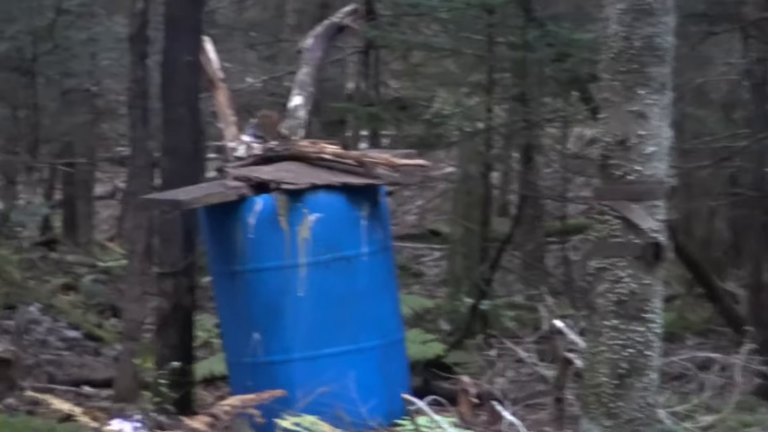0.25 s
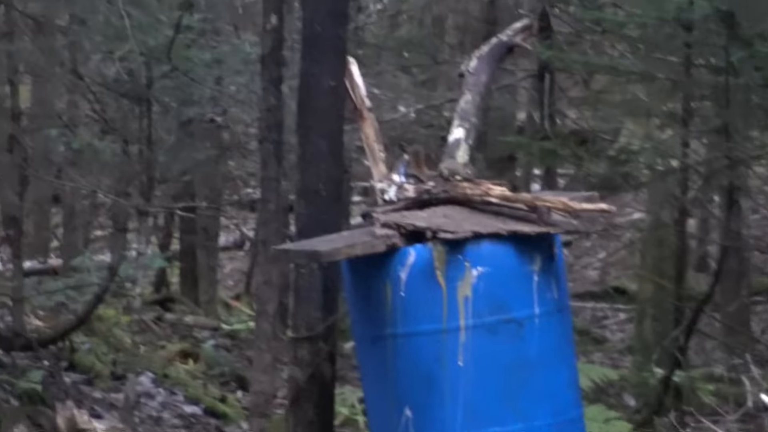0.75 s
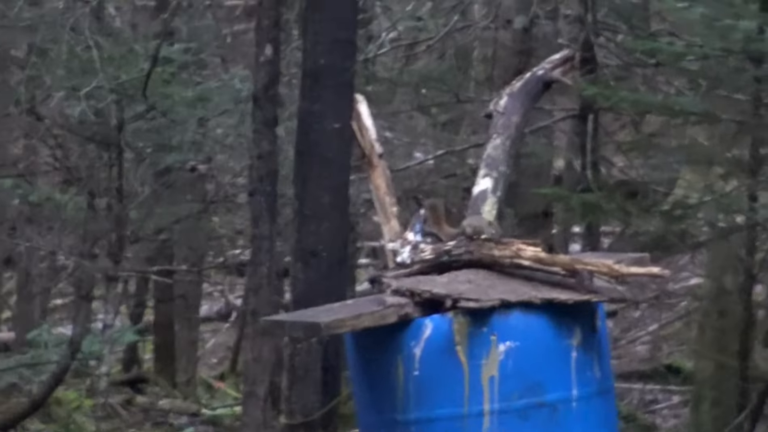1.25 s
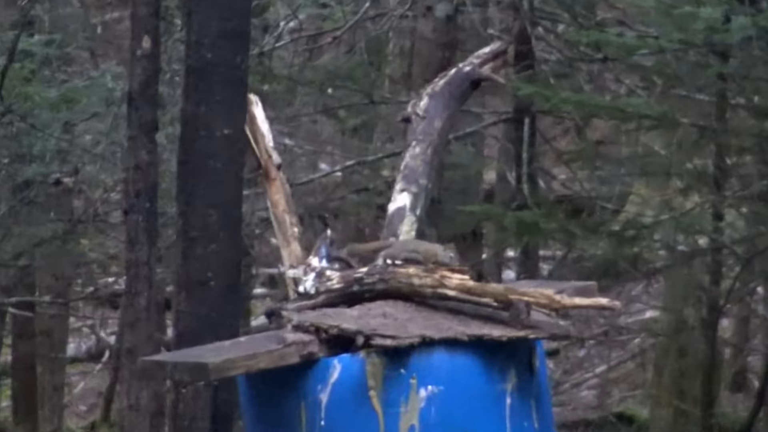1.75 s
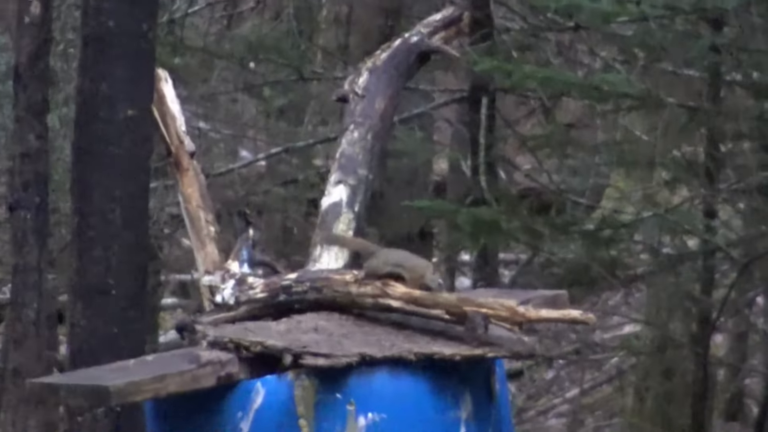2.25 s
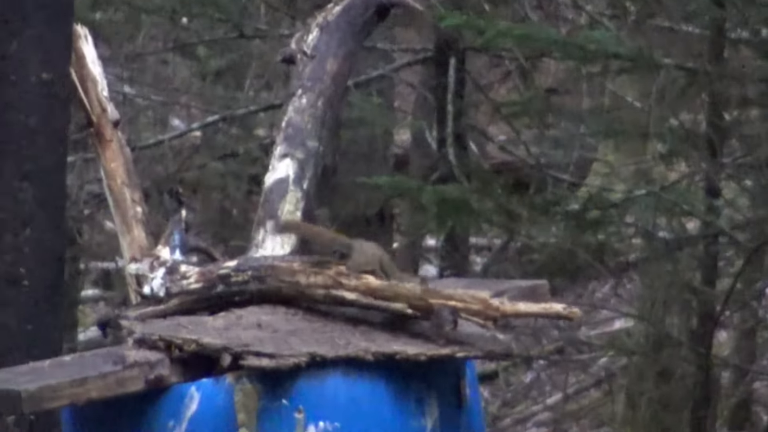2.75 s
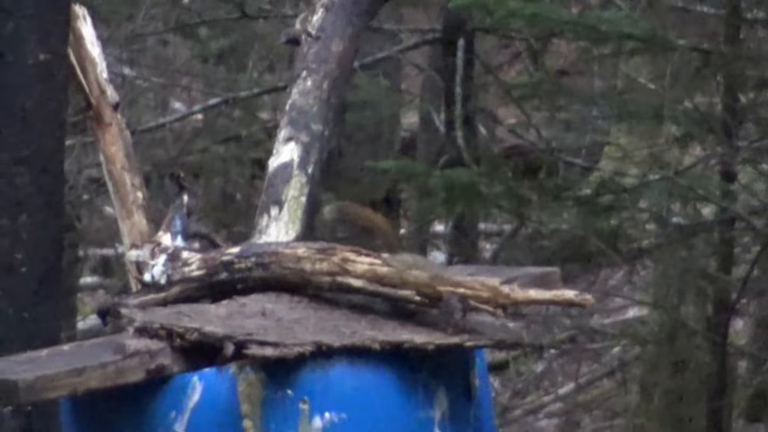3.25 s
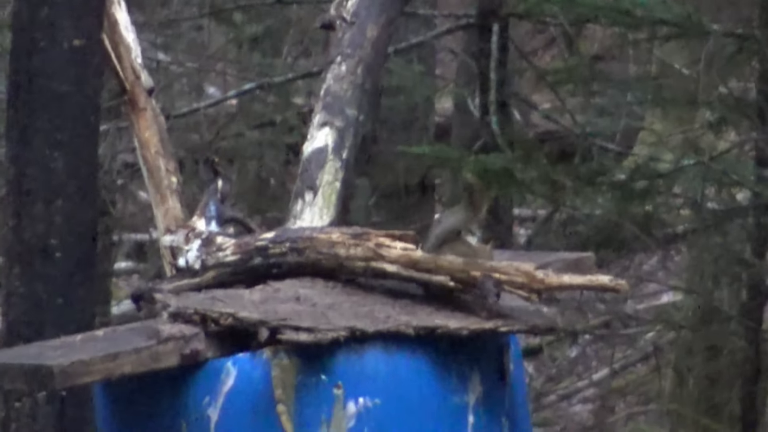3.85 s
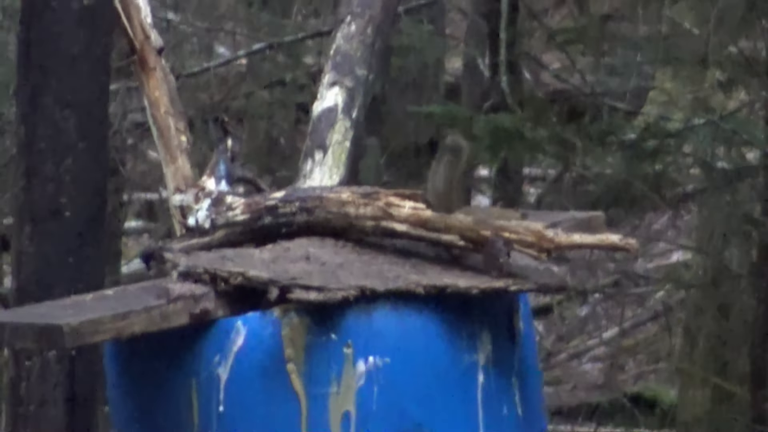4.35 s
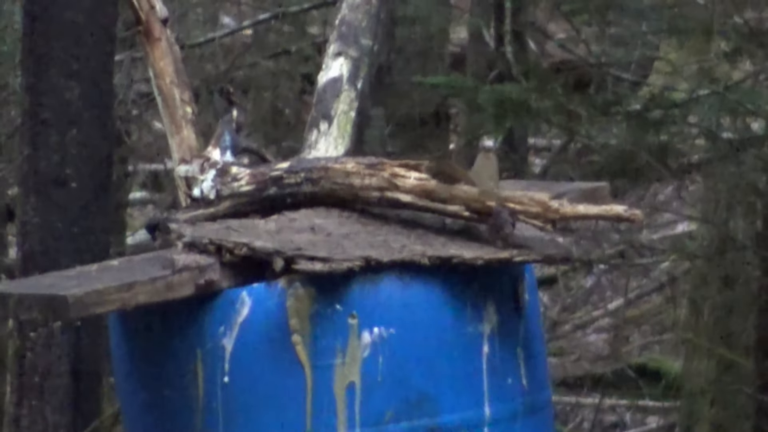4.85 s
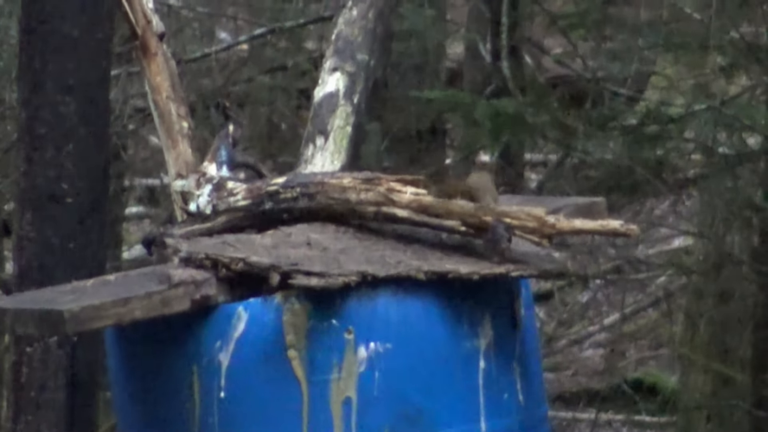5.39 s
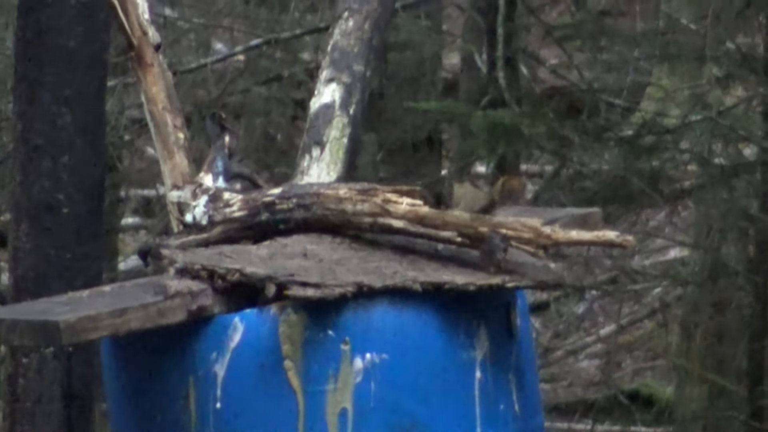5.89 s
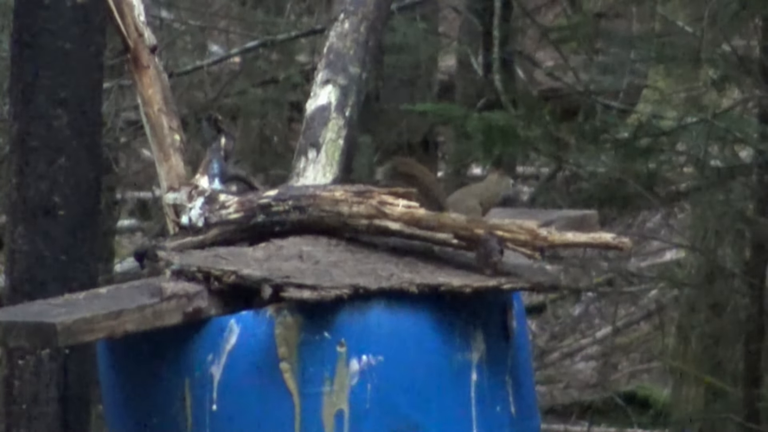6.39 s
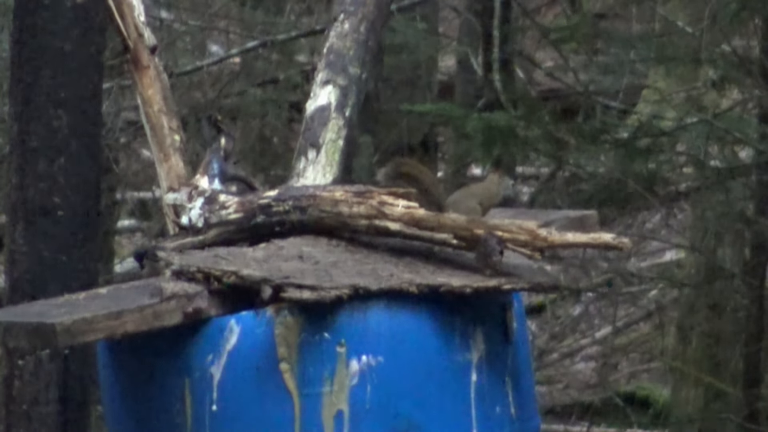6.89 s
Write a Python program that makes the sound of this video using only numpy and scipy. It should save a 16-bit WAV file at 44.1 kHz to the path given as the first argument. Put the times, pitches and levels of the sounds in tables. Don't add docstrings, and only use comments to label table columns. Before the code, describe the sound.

Heavy, fluttering low rumble from wind and shaky hands starts at once and buffets the microphone until about 5.2 seconds, over faint airy hiss in the woods. A dull tap comes at 0.2 seconds, a faint distant chirp at 0.7, and the first near squirrel chirp at 0.9: a tiny piercing upward whistle, then a hoarse bark, echoing among trunks. A cluster of knocks follows at 1.2 to 1.3, with a quick bright cloth rub around 1.4. Near chirps return at 2.3, 3.7, 5.1 and 6.6 seconds, the third having barely any bark; fainter, echo-blurred far chirps come at 2.6, 4.4 and 6.0. More low knocks land at 2.4 and 3.1, a hard one with a small tick at 3.7, then a strong wind thump at 3.8. A soft brush passes near 4.1, and faint taps at 4.8. After 5.3 the rumble dies down, leaving the last calls clear.

```python
import sys
import numpy as np
from scipy import signal
from scipy.fft import rfft, irfft
from scipy.io import wavfile
from scipy.ndimage import uniform_filter1d

SR = 44100
rng = np.random.default_rng(int(sys.argv[2]) if len(sys.argv) > 2 else 0)


def elevation(decibels):
    levels = np.asarray(decibels, float)
    return 10 ** (levels / 20)


def master(y):
    cut = np.clip(np.atleast_2d(y).T, -1, 1)
    pcm = np.round(cut * 32767)
    wavfile.write(sys.argv[1], SR, pcm.astype(np.int16))


N = 314433
TIME = np.arange(N) / SR


def evened(x):
    return x / np.sqrt(np.mean(x ** 2) + 1e-20)


def read(points, hz):
    f, value = np.transpose(points)
    return np.interp(np.log(hz + 1), np.log(f + 1), value)


def add(mix, s, sound):
    part = mix[round(s * SR):][:len(sound)]
    part += sound[:len(part)]


def coloured(points, count=N):
    hz = np.fft.rfftfreq(count, 1 / SR)
    spectrum = rfft(rng.standard_normal(count)) * elevation(read(points, hz))
    return evened(irfft(spectrum, count))


def drift(count, size):
    once = uniform_filter1d(rng.standard_normal(count), size=size)
    return evened(uniform_filter1d(once, size=size))


# time in seconds, level in dB.
WIND = [(0, -20.5), (.6, -22.5), (1.5, -21.5), (1.85, -26), (2.1, -20), (2.95, -23), (3.5, -23),
        (4.3, -23.5), (5.1, -22), (5.35, -27), (5.9, -31.5), (6.7, -34), (6.95, -40.5), (7.13, -33.5)]
# start in seconds, length in seconds, level in dB,
# upper rumble in dB.
GUSTS = [(0.021, 0.027, -20, -45), (0.138, 0.2, -16.5, -35.5), (0.373, 0.13, -16.5, -41),
         (0.598, 0.026, -16, -49), (0.72, 0.07, -23.5, -51), (0.956, 0.03, -20, -39),
         (1.104, 0.046, -28, -41), (1.287, 0.079, -17.5, -31.5), (1.455, 0.028, -16, -39),
         (1.618, 0.052, -20.5, -45), (1.962, 0.035, -17.5, -51), (2.07, 0.024, -15.5, -53),
         (2.264, 0.12, -18.5, -46), (2.413, 0.033, -15.5, -35.5), (2.477, 0.069, -18.5, -37.5),
         (2.644, 0.025, -22, -53), (3.04, 0.04, -20, -32.5), (3.081, 0.18, -17, -44),
         (3.46, 0.031, -17, -54), (3.721, 0.14, -17, -29.5), (3.894, 0.075, -19.5, -61),
         (4.12, 0.034, -17, -53), (4.347, 0.05, -15.5, -51), (4.497, 0.044, -17, -51),
         (4.636, 0.02, -16, -49), (4.74, 0.1, -13.5, -31), (4.873, 0.14, -16.5, -39.5),
         (5.044, 0.063, -18, -47), (5.182, 0.047, -24, -51)]


def gusts(edge_s=0.0317, upper_calm_db=-42):
    low = elevation(np.interp(TIME, *np.transpose(WIND))) ** 2
    upper = elevation(upper_calm_db) ** 2
    for s, length, low_db, upper_db in GUSTS:
        inside = np.minimum(TIME - s, s + length - TIME)
        shape = np.clip(inside / edge_s + .5, 0, 1) ** 2
        low = low + shape * elevation(low_db) ** 2
        upper = upper + shape * elevation(upper_db) ** 2
    return np.sqrt(low), np.sqrt(upper)


# frequency in Hz, density in dB per Hz.
SHAKE = [(5.9, -49), (10, 5.5), (22, 0), (37, 4.5), (51, -7.5), (70, -20), (90, -39), (120, -70),
         (200, -120)]
# frequency in Hz, density in dB per Hz.
UPPER = [(50, -51), (75, 8.5), (100, 5.5), (140, -5), (220, -10.5), (400, -51.5)]
# time in seconds, level in dB, half width in seconds.
PUSH = (3.797, -.5, .008)


def rumble(steady=0.38, apart_db=-41, upper_apart_db=-27):
    low, upper = gusts()
    shake = coloured(SHAKE)
    swing = np.sqrt(uniform_filter1d(shake ** 2, size=3000) + 0.025)
    mid = low * evened(shake / swing ** steady) + upper * coloured(UPPER)
    push_s, push_db, half_width_s = PUSH
    push = np.exp(-abs((TIME - push_s) / half_width_s) ** 1.2)
    mid = (1 - np.sqrt(push)) * mid + elevation(push_db) * push
    side = low * elevation(apart_db) * coloured(SHAKE)
    side += upper * elevation(upper_apart_db) * coloured(UPPER)
    return np.array([mid + side, mid - side])


# frequency in Hz, density in dB per Hz.
AIR = [(120, -43.5), (200, -4.5), (293, -1), (327, -2.5), (385, -3), (597, -6.5), (716, -4.5), (828, -10),
       (941, -8), (1400, -12.5), (1850, -10), (2860, -8.5), (3760, -19), (6030, -19.5), (15600, -26.5)]
# frequency in Hz, left-right likeness from 0 to 1.
SAME = [(60, 0.74), (150, 1), (380, 0.97), (950, 0.96), (2380, 0.97), (5980, 0.79), (15000, 0.4)]
# frequency in Hz, left minus right in dB.
LEAN = [(60, -37), (180, -0.5), (550, -1.0), (1650, -1.5), (4970, -0.5), (15000, 0.5)]


def air(level_db=-45, patchy_db=1.5):
    frames, hz = N // 256 + 5, np.fft.rfftfreq(1024, 1 / SR)
    a, b, c, d, patches = rng.standard_normal((frames, 513, 5)).T
    patches = uniform_filter1d(patches, size=12, axis=0)
    patches = evened(uniform_filter1d(patches, size=14, axis=1))
    same = np.clip(read(SAME, hz), -1, 1)[:, None]
    left = a + 1j * b
    right = same * left + np.sqrt(1 - same ** 2) * (c + 1j * d)
    z = np.array([left, right])
    z *= elevation(read(AIR, hz)[:, None] + patchy_db * patches)
    z *= elevation(np.outer([.5, -.5], read(LEAN, hz)))[:, :, None]
    return elevation(level_db) * evened(signal.istft(z, nperseg=1024, noverlap=768)[1][:, :N])


# start in seconds, thump level in dB, thump frequency in Hz,
# scuff level in dB, scuff length in seconds.
KNOCKS = [
    (0.236, -21, 121, -58, 0.009),
    (1.162, -18, 195, -38, 0.008),
    (1.222, -21.5, 194, -40, 0.0077),
    (1.313, -12.5, 204.5, -36.5, 0.0095),
    (2.431, -22, 104, -32.5, 0.01),
    (3.114, -19.5, 104, -33.5, 0.016),
    (3.705, -12, 99, -29.5, 0.019),
    (4.79, -24.5, 98, -60, 0.0081),
    (4.862, -22, 116, -39, 0.019),
]
# frequency in Hz, level in dB.
SCUFF = [(150, -3.5), (600, 1.5), (1200, -11), (2200, -2.5), (3500, -13.5), (8000, -17), (15000, -37)]
# start in seconds, level in dB, frequency in Hz, t60 in seconds.
TICK = (3.708, -27, 2080, .025)


def knocks(thump_t60=0.079):
    out, t = np.zeros(N), np.arange(SR // 4) / SR
    for s, db, hz, scuff_db, length in KNOCKS:
        thump = elevation(db - 60 * t / thump_t60) * np.sin(2 * np.pi * hz * t)
        thump += elevation(db - 8.0 - 60 * t / 0.053) * np.sin(2 * np.pi * 1.84 * hz * t)
        thump += elevation(db - 6.5 - 60 * t / 0.021) * np.sin(2 * np.pi * 2.9 * hz * t)
        stroke = 3 * t / length * np.exp(1 - 3 * t / length)
        scuff = elevation(scuff_db) * coloured(SCUFF, count=len(t)) * stroke
        add(out, s, thump * np.clip(t / 0.0018, 0, 1) + scuff)
    tick_s, tick_db, tick_hz, tick_t60 = TICK
    tick = elevation(tick_db - 60 * t / tick_t60) * np.sin(2 * np.pi * tick_hz * t)
    add(out, tick_s, tick * np.clip(t / .002, 0, 1))
    rattle = elevation(-21.5) * (out - np.roll(out, 40))
    return np.array([out - rattle, out + rattle])


# peak time in seconds, level in dB, swell in dB per second,
# fade in dB per second.
CLOTH = [
    (.6, -55, 598.5, 300),
    (.78, -46.5, 82, 120),
    (1.374, -41.5, 267, 362),
    (1.442, -34.5, 396, 367),
    (1.52, -53, 200, 55),
    (4.078, -49.5, 55, 218),
]
# frequency in Hz, density in dB per Hz.
CLOTH_COLOUR = [(880, -50), (1500, -17), (2400, -18), (2890, -11), (4530, -13.5), (6710, -5), (12500, -17),
                (15600, -28)]


def cloth(grain_db=2, gain_db=2):
    level = np.zeros(N)
    for s, db, swell, fade in CLOTH:
        level += elevation(db + gain_db - np.maximum(swell * (s - TIME), fade * (TIME - s)))
    grain = elevation(grain_db * evened(uniform_filter1d(rng.standard_normal(N), size=90)))
    shared, apart = coloured(CLOTH_COLOUR), coloured(CLOTH_COLOUR)
    return level * evened(grain) * np.array([shared + 0.17 * apart, shared - 0.26 * apart])


def squeak(length, from_hz, to_hz, db, waver=.03, flutter_db=3):
    t = np.arange(0, length, 1 / SR)
    hz = (from_hz + (to_hz - from_hz) * t / length) * (1 + waver * drift(len(t), 60))
    level = elevation(db + flutter_db * drift(len(t), 60)) * np.sin(np.pi * t / length)
    return level * np.sqrt(2) * np.sin(2 * np.pi * np.cumsum(hz) / SR)


def resonate(x, hz, width):
    turn = np.exp(2j * np.pi * hz * np.arange(len(x)) / SR)
    r = np.exp(-np.pi * width / SR)
    return 2 * (turn * signal.lfilter([1 - r], [1, -r], x / turn)).real


def whistle(db, hz, length, lead, scoop=0.11, climb_s=0.011, drop=.05, rise=0.018, half_db=-28,
            double_db=-50, flutter_db=2, airy_db=-23, waver=.008):
    t = np.arange(0, length, 1 / SR)
    climb = 1 - scoop * np.exp(-np.maximum(t - lead, 0) / climb_s)
    fall = drop * np.clip(1 - (length - t) / .006, 0, 1)
    pitch = np.where(t < lead, .53 + .17 * t / lead, climb - fall)
    pitch += waver * evened(uniform_filter1d(rng.standard_normal(len(t)), size=60))
    turn = 2 * np.pi * np.cumsum(hz * uniform_filter1d(pitch, size=40)) / SR
    full_s = min(lead + .003 + rise, length - .009)
    moments = [0, lead, lead + .002, full_s, length - .007, length - .005, length]
    level_db = np.interp(t, moments, [-32, -22, -11, -3, 0, -12, -19])
    level_db += flutter_db * drift(len(t), 80)
    weak = elevation(half_db) * np.sin(turn / 2)
    weak += elevation(double_db) * np.sin(2 * turn)
    breath = resonate(rng.standard_normal(len(t)), .9 * hz, 1800)
    weak += elevation(airy_db) * evened(resonate(breath, .9 * hz, 1800))
    return elevation(db + level_db) * np.sqrt(2) * (np.sin(turn) + weak)


# frequency in Hz, width in Hz,
# level in dB, moment in the bark from 0 to 1.
THROAT = [(1000, 700, -1, .4), (3200, 800, -10, 0.8), (4230, 330, -28, 1), (7150, 500, -11, 0.55),
          (9700, 720, -11, 0.2), (13400, 1300, -15, 0.47)]
# frequency in Hz, level in dB.
RASP = [(1500, -19), (3000, 0), (4700, -0.5), (7500, -2.5), (11000, -9.5), (14000, -16), (16000, -26)]


def bark(db, hz, length, rough, rasp_db=-4.5, clump_db=3):
    t = np.arange(0, length, 1 / SR)
    arch = np.interp(t / length, [0, .37, .6, 1], [.46, 1, .8, .64])
    turns = np.cumsum(hz * arch) / SR
    folds = sum(np.cos(2 * np.pi * k * turns) for k in range(1, 13))
    puff = 1.08 + np.exp(-(turns % 1) / 0.55)
    drive = (1 - rough) * evened(folds) + rough * evened(puff * rng.standard_normal(len(t)))
    surge_db = 1.9 * np.sin(t * rng.uniform(540, 880) + rng.uniform(0, 6.7))
    onset = np.clip(t / 0.0081, .05, 1) ** 2
    out = elevation(rasp_db + surge_db) * puff * coloured(RASP, count=len(t)) * onset
    for f, width, d, moment in THROAT[1:]:
        ring = evened(resonate(resonate(drive, f, width), f, 2 * width))
        opening = np.exp(-((t / length - moment) / .32) ** 2)
        out += elevation(d + clump_db * drift(len(t), 200)) * ring * opening
    fundamental = np.sin(2 * np.pi * turns) * np.sqrt(np.sin(np.pi * t / length))
    out += elevation(THROAT[0][2]) * fundamental
    return elevation(db - 4.0) * out * signal.windows.tukey(len(t), .25)


# frequency in Hz, t60 in seconds.
WOODS = [(1000, 0.14), (3000, 0.84), (6000, 0.77), (10000, 0.74), (15000, 0.59)]


def woods(start=300, linger=1.0, build=0.021):
    taps = np.zeros((2, SR))
    places = np.arange(start, SR - 20, 20)
    at = places + rng.integers(0, 20, (2, len(places)))
    np.put_along_axis(taps, at, rng.choice([-1., 1.], at.shape), 1)
    hz, t, z = signal.stft(taps, SR, nperseg=256)
    decay = elevation(-60 * t / (linger * read(WOODS, hz)[:, None]))
    tail = signal.istft(z * decay, SR, nperseg=256)[1][:, :SR]
    tail = np.array([tail[0] + 0.2 * tail[1], tail[0] - 0.2 * tail[1]])
    tail *= np.clip(np.arange(SR) / SR / build, .08, 1)
    return tail / np.linalg.norm(tail[0])


# start in seconds, whistle level in dB, pitch in Hz, low note in dB,
# high note in dB.
FAR = [
    (0.722, -38.5, 5730, -18, -20),
    (2.636, -39, 5630, -11, -7),
    (4.371, -38.5, 5625, -12, -2.5),
    (5.979, -40.5, 5610, -6, -16),
]


def far_squirrel(direct_db=-6, lean_db=0.5, whistle_s=.042):
    out = np.zeros((2, N))
    for s, db, hz, low_db, high_db in FAR:
        call, path = np.zeros(SR // 4), woods(start=100, linger=1.27, build=0.031)
        add(call, 0, squeak(.045, .65 * hz, .67 * hz, db + low_db, waver=.05, flutter_db=5))
        add(call, .008, whistle(db, hz, whistle_s, .001, scoop=.015, drop=.1, rise=.003, flutter_db=4,
                                half_db=-36, double_db=-19, airy_db=-18))
        add(call, whistle_s + .008, whistle(db + high_db, 1.13 * hz, 0.028, 0.00088, scoop=0.029))
        add(call, .03, bark(db - 15.5, 1000, 0.045, 0.73, rasp_db=7))
        path[:, 0] = elevation(direct_db)
        for side, heard in zip(out, signal.fftconvolve(call[None], path, axes=1)):
            add(side, s - .008, heard)
    return out * elevation([[-lean_db], [lean_db]])


# start in seconds, whistle level in dB, top pitch in Hz, length in seconds,
# faint lead-in in seconds.
CHIRPS = [
    (0.9285, -21.5, 6247, 0.051, 0.0025),
    (2.3035, -19.5, 6140, 0.045, 0.003),
    (3.695, -20.5, 6290, 0.039, 0.003),
    (5.110, -17.5, 6110, 0.046, 0.008),
    (6.613, -18, 6110, 0.046, 0.006),
]
# scoop as a share below the top, climb in seconds,
# end drop as a share, scatter in dB as the head turns.
BENDS = [(.14, 0.011, 0.24, -11), (0.11, 0.015, 0.18, -11), (0.14, 0.0097, 0.013, -7),
         (0.097, 0.0091, .16, -13), (0.1003, 0.00896, 0.16, -14)]
# start in seconds, level in dB, top pitch in Hz, length in seconds,
# resumed whistle in dB.
BARKS = [
    (0.985, -28.5, 1138, 0.031, -29),
    (2.354, -30, 1257, 0.036, -29),
    (3.760, -44, 1113, 0.023, -50),
    (5.163, -30.5, 1180, 0.025, -23),
    (6.666, -29, 1180, 0.031, -23),
]
# start in seconds, length in seconds, from Hz,
# to Hz, level in dB.
SQUEAKS = [(0.999, 0.015, 2930, 2750, -32), (1.009, 0.014, 3350, 3280, -32), (2.352, 0.01, 3620, 3410, -38),
           (2.372, 0.017, 3240, 2770, -33), (2.382, 0.021, 3420, 3370, -31.5),
           (2.361, .026, 7250, 7230, -36), (2.356, .02, 10100, 9600, -44), (.987, .016, 10000, 9700, -43),
           (.99, .03, 13300, 13400, -46), (5.111, .012, 3500, 4300, -35), (6.613, .011, 3600, 4200, -35),
           (6.672, .02, 13500, 13300, -44), (3.717, .026, 11900, 12760, -47),
           (3.745, .022, 3300, 3100, -45), (3.75, .03, 9750, 9700, -52), (3.765, 0.016, 3200, 3580, -41),
           (5.169, 0.014, 3480, 2900, -38), (5.184, 0.01, 3050, 3810, -28), (5.19, .008, 4200, 4800, -44),
           (5.214, 0.014, 3420, 3200, -42), (5.167, 0.014, 9900, 9770, -43), (6.665, .012, 9800, 9600, -44),
           (6.674, .023, 3400, 3310, -33.5), (6.694, 0.016, 3030, 2680, -34.5),
           (6.694, 0.011, 3720, 4300, -39), (6.709, .013, 2980, 3400, -42)]
# delay in seconds, level in dB.
ECHOES = [(.007, -15), (.015, -15), (.024, -18), (0.041, -18), (0.051, -27), (.066, -24), (.098, -24),
          (.15, -24)]


def near_squirrel(squeak_tail_db=-6.5, bark_tail_db=-3, lean_db=1.2):
    out = np.zeros((2, N))
    for chirp, bend, hoarse_call in zip(CHIRPS, BENDS, BARKS):
        s, db, hz, length, lead = chirp
        scoop, climb_s, drop, tail_db = bend
        bark_s, *hoarse, again_db = hoarse_call
        tail, path = woods(), np.zeros(SR)
        path[0] = 1
        for delay, echo_db in ECHOES:
            at = round(delay * SR * rng.uniform(.96, 1.04))
            path[at] += elevation(echo_db + 2 * rng.standard_normal())
        clear, rough, notes = np.zeros((3, SR // 8))
        add(clear, 0, whistle(db, hz, length, lead, scoop, climb_s, drop))
        again_s = bark_s + hoarse[2] - s - length
        add(clear, length, whistle(again_db, hz, again_s, 0.001105, scoop=0.029, climb_s=0.0032,
                                   drop=.08, rise=0.0031))
        add(rough, bark_s - s, bark(*hoarse, rough=0.55))
        for squeak_s, *note in SQUEAKS:
            if 0 <= squeak_s - s < .11:
                add(notes, squeak_s - s, squeak(*note))
        for side, scatter in zip(out, tail):
            add(side, s, signal.fftconvolve(clear, path + elevation(tail_db) * scatter))
            add(side, s, signal.fftconvolve(rough, path + elevation(bark_tail_db) * scatter))
            add(side, s, signal.fftconvolve(notes, path + elevation(squeak_tail_db) * scatter))
    return out * elevation([[-lean_db], [lean_db]])


def scene():
    return rumble() + air() + knocks() + cloth() + far_squirrel() + near_squirrel()


# start in seconds, length
# in seconds, threshold over the hiss in dB.
DRY = [(0.02, 0.023, 9.5), (0.066, 0.023, 5), (0.182, 0.07, 16.5), (0.275, 0.07, 14), (0.368, 0.046, 9),
       (0.414, 0.023, 17.5), (0.438, 0.046, 9.5), (0.507, 0.023, 6), (0.53, 0.023, 12.5), (0.6, 0.046, 9),
       (0.902, 0.023, 4), (1.157, 0.023, 0.9), (1.297, 0.023, 11), (1.599, 0.07, 7.5), (1.831, 0.023, 0.5),
       (1.924, 0.023, 10), (1.947, 0.023, 11), (1.993, 0.023, 14), (2.017, 0.023, 5), (2.063, 0.023, 12.5),
       (2.156, 0.023, 6.5), (2.202, 0.023, 9.5), (2.504, 0.093, 9), (2.643, 0.023, -1), (2.76, 0.023, 5),
       (3.038, 0.116, 8), (3.154, 0.023, 8), (3.201, 0.023, 14), (3.247, 0.023, 9), (3.34, 0.023, 14),
       (3.41, 0.046, 5), (3.479, 0.023, 6), (3.712, 0.023, 3.0), (3.735, 0.046, 11.8), (3.804, 0.023, 15),
       (3.851, 0.046, 6), (3.921, 0.07, 9.5), (4.13, 0.023, 6), (4.339, 0.046, 10), (4.524, 0.023, 14),
       (4.571, 0.023, 9), (4.664, 0.07, 9.5), (4.757, 0.023, 16.5), (4.78, 0.023, 26), (4.803, 0.023, 17),
       (4.826, 0.093, 6.5), (4.919, 0.07, 13), (5.012, 0.046, 2.9), (5.082, 0.023, 13),
       (.902, .023, 13), (2.272, .023, 8), (2.574, .023, 13), (2.62, .023, 6.5), (3.386, .023, 11),
                (3.735, .046, 21), (3.804, .023, 25), (4.2, .023, 8)]


def starved(x, hiss_db=-89.0, calm_db=-3.5, windy=0.65, frame_db=4.5, tilt_db=1.2, guard_db=-3,
            band_db=2.8, drain_db=0.6, edge_hz=15720, grid=670):
    framing = dict(nperseg=2048, noverlap=1024, window="cosine")
    hz, t, z = signal.stft(np.pad(x, ((0, 0), (grid, 0))), SR, **framing)
    t = t - grid / SR
    power = (abs(z) ** 2).mean(0) + 1e-20
    wind_db = np.interp(t, *np.transpose(WIND))
    step_db = calm_db + windy * (wind_db + 22) + frame_db * rng.standard_normal(len(t))
    for s, length, dry_db in DRY:
        step_db = np.where((t > s) & (t < s + length), dry_db + drain_db, step_db)
    tilt = tilt_db * np.log2(np.maximum(hz, 4000) / 8000)[:, None]
    step_db = hiss_db + step_db + tilt
    step_db += guard_db * (hz < 3500)[:, None]
    bands = rng.standard_normal((33, len(t))).repeat(32, axis=0)
    step_db += band_db * bands[:len(hz)]
    excess_db = 10 * np.log10(power) - step_db
    keep = 1 / (1 + np.exp(-np.clip(10 * excess_db, -20, 20)))
    kept = signal.istft(z * keep * (hz < edge_hz)[:, None], **framing)[1]
    return kept[:, grid:grid + N]


def band_limit(x):
    return signal.sosfilt(signal.butter(12, 15710, fs=SR, output="sos"), x)


def record(dry):
    limited = np.clip(dry, -.97, .97)
    mix = starved(limited)
    return band_limit(mix)


dry = scene()
out = record(dry)
master(out)
```